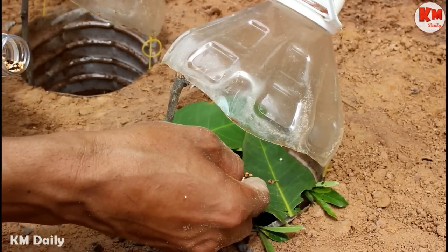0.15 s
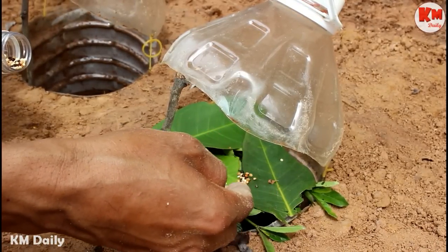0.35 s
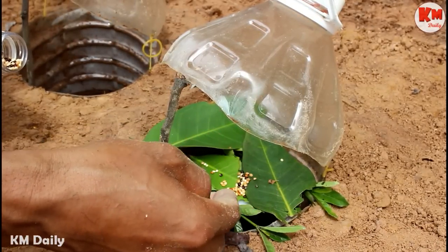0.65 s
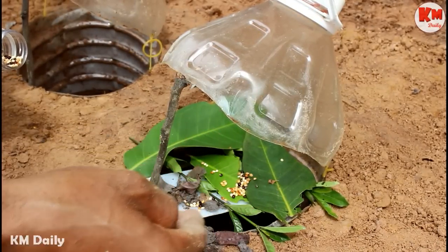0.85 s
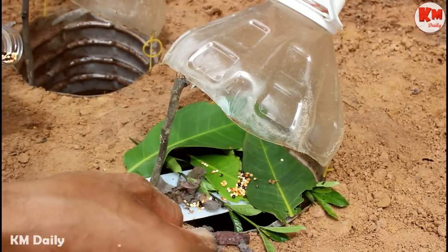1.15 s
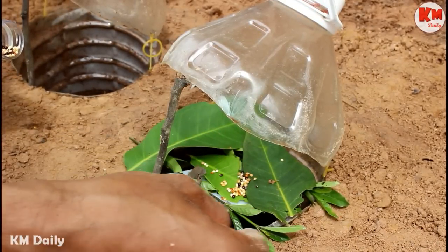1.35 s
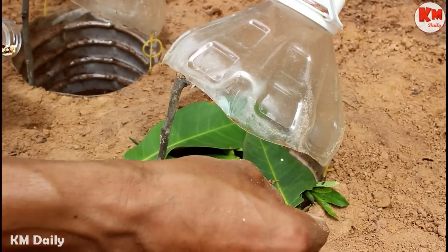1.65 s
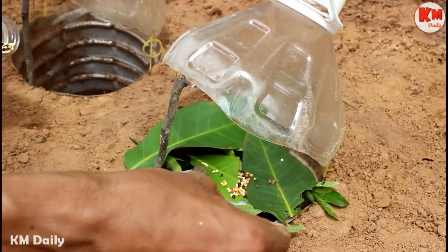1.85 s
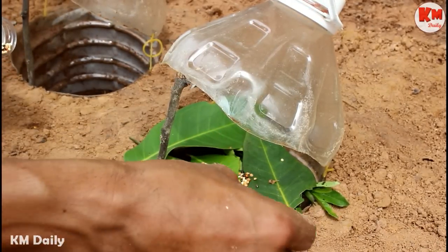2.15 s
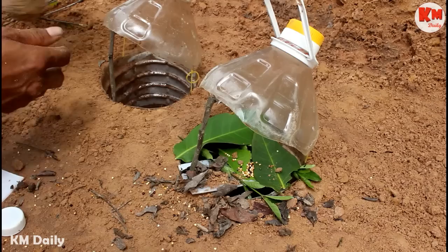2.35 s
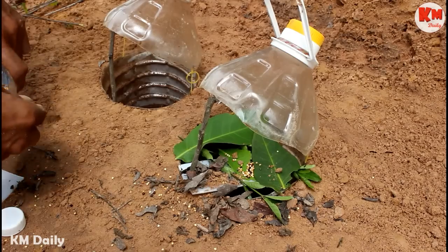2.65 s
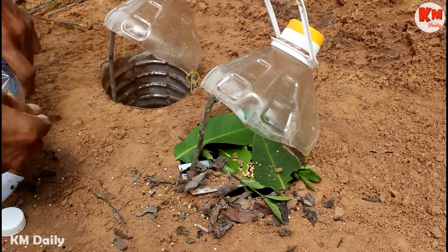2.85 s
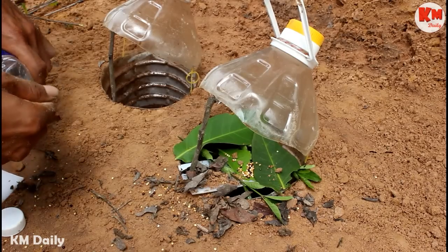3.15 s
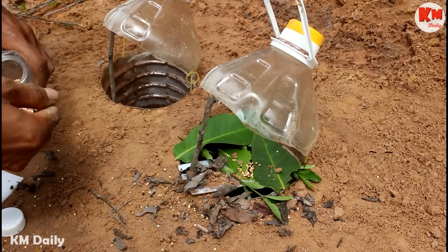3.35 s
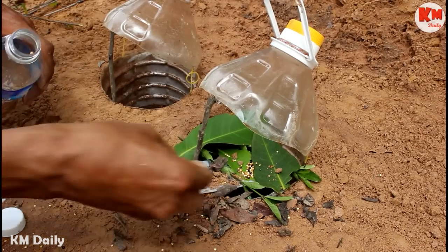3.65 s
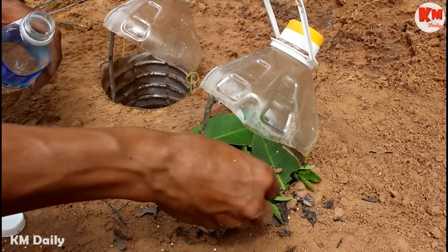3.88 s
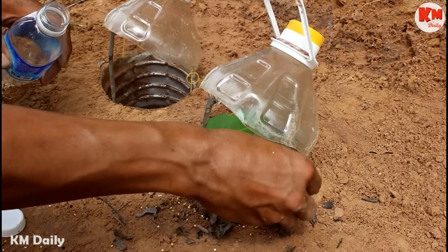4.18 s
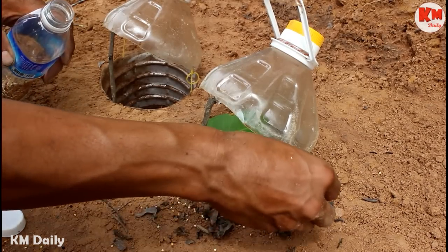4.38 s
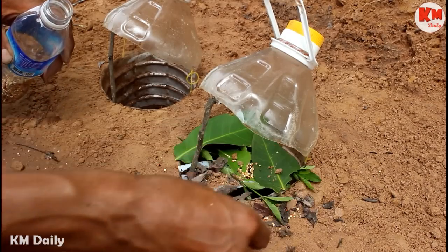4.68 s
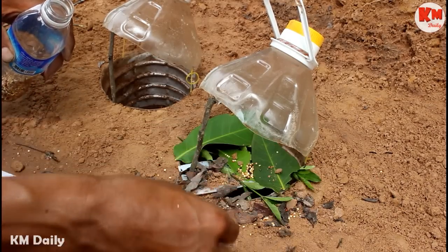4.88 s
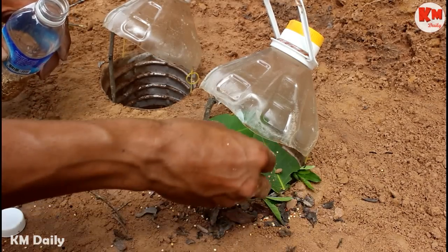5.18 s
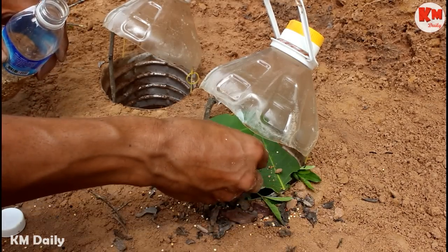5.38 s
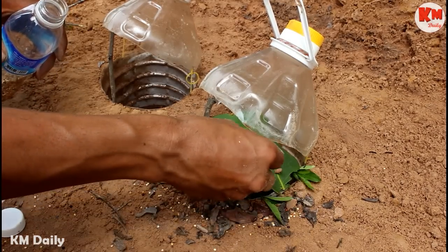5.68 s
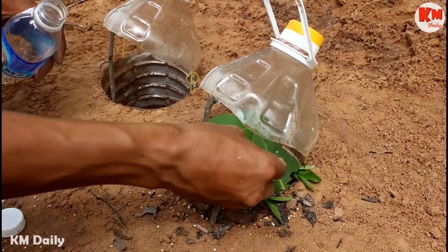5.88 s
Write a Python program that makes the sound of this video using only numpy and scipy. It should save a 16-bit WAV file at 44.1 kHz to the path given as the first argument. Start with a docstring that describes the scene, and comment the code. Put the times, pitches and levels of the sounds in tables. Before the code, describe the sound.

A close stereo microphone in open countryside catches crisp leaf crackles and fine grit under fingers, with a dull soil bump. Far knocks, chirps and a low engine-like hum sit faintly behind. After a very short complete silence, loose seed shakes and slides in a plastic bottle, which knocks against the hand. A few low gusts lead into sparser twig snaps and light scratching.

```python
"""Seed rattles out of a small plastic bottle into a palm: random collisions ring the wall, the hollow and the neck,
and filtered modes give the taps on the wall. Before it, fingers settle leaves and twigs on dry soil:
noise bursts snap, grit crackles, sand ticks and soil thuds. A short silence parts the two; more snaps and rubbing
follow, and low gusts from the arm. Far off are a wavering sine hum, dull knocks of noise with echoes,
falling sine chirps and a narrow insect buzz over coloured noise for open air."""
import sys
import numpy as np
from scipy import signal
from scipy.fft import rfft, irfft, next_fast_len
from scipy.io import wavfile
from scipy.ndimage import uniform_filter1d

SR = 44100
rng = np.random.default_rng(int(sys.argv[2]) if len(sys.argv) > 2 else 0)


def store_wav(level_fs):
    """Save 16-bit WAV to argv[1]."""
    pcm = np.round(np.clip(np.atleast_2d(level_fs), -1, 1) * 32767)
    wavfile.write(sys.argv[1], SR, pcm.T.astype(np.int16))


N = 265702
TIME = np.arange(N) / SR   # seconds
SIZE = 2 * next_fast_len(N // 2 + 8192)   # padded transform length in samples
HZ = np.maximum(np.arange(SIZE // 2 + 1) * SR / SIZE, 1)   # pitch of each bin

# In every colour table below, each row: frequency in Hz, relative level in dB.
# In every likeness table, each row: frequency in Hz, left-right correlation from -1 to 1.

# Open air before and after the silence, and its stereo likeness.
AIR_EARLY_COLOUR = [(15, -69), (25, -23), (59, -15.5), (86, -12), (116, -11), (165, -13), (276, -15.5),
                    (571, -19), (980, -23.5), (2660, -28.5), (6830, -35), (7610, -36), (15800, -48)]
AIR_LATE_COLOUR = [(18, -41), (30, -6.5), (53, -1), (134, -1), (169, -6), (209, -6.5), (309, -7), (335, -8),
                   (424, -10.5), (697, -13), (1210, -17), (1310, -15), (1450, -17), (3270, -19),
                   (15800, -36)]
AIR_LIKENESS = [(50, 0.19), (120, 0.42), (260, -0.22), (640, -0.37), (1500, -0.52), (3500, -0.13),
                (14000, 0.08)]
AIR_EARLY_DB, AIR_LATE_DB = -51, -51.5
# The silence. Its two values: start in seconds, end in seconds.
SILENCE = (2.207, 2.302)
# Fader ride of the hum. Each row: time in seconds, level in dB.
HUM_LEVEL = [(0.0, -53), (0.05, -51), (0.71, -50.5), (0.82, -56.5), (2.1, -47.5), (2.19, -54)]
# Insect calls, each swelling to its end. Each row: time at the top in seconds, level in dB.
BUZZES = [(.8, -65.5), (1.835, -64)]
BUZZ_RISE_S, BUZZ_HOLD_S, BUZZ_FALL_S = 0.72, 0.06, 0.03
# Strokes of the fingers over leaves and grit. Each row: start at full level in seconds, hold in seconds, level in dB.
RUBS = [(0.0, .01, -52.5), (0.242, 0.91, -60), (3.88, 0.67, -60.5), (5.614, 0.3, -60.5)]
RUB_RISE_S, RUB_FALL_S = 0.61, 0.47
# Colour of the rubbed grit.
GRIT_COLOUR = [(100, -30), (500, -1), (1100, 0.5), (1800, -0.5), (4500, -3.5), (9000, -11), (15500, -35)]
# Leaves and twigs snapping. Each row: start in seconds, relative level in dB, ring in Hz,
# treble in dB before a shared boost, decay t60 in seconds.
SNAPS = [(0.0507, -43, 3340, -19, .029), (0.067, -44.5, 1720, -21, 0.057), (0.1316, -28, 4270, -14, .04),
         (0.366, -39, 5460, -13, .054), (0.3824, -36, 4400, 0, .046), (0.4555, -23, 1850, -7, 0.027),
         (0.4996, -35.5, 4290, -6, .056), (0.6888, -39, 8350, 4, 0.051), (0.817, -33.5, 8200, -4, 0.046),
         (0.978, -32, 2760, -7.5, .037), (0.9938, -35.5, 2850, -10, .025), (1.102, -36.5, 4150, -11, 0.041),
         (1.1482, -40, 3680, -31, 0.063), (1.261, -36, 3740, -8, .044), (3.153, -40.5, 3440, -25, 0.031),
         (3.973, -39.5, 2900, -8, 0.035), (4.329, -31.5, 1910, -14.5, .045), (4.3663, -43, 2080, -18, .043),
         (4.516, -38, 4400, -16, 0.015), (4.5245, -33.5, 4700, -4, 0.036), (5.1301, -42, 1680, -24, 0.044),
         (5.158, -41, 1680, -10, .04), (5.3337, -38.5, 2970, -10.5, .028), (5.799, -41.5, 5760, -11, .038),
         (5.8652, -42, 1890, -28, 0.037)]
# Colour shared by the snaps.
SNAP_COLOUR = [(60, -31), (240, -5), (450, -13), (1000, -19.5), (1800, -1), (3500, -1.5), (6000, -3.5),
               (10000, -10.5), (15500, -30)]
# Far dull knocks. Each row: start in seconds, level in dB before the echo levels.
FAR_KNOCKS = [(0.179, -50), (0.65, -51.5), (2.028, -50.5), (4.138, -53)]
# Each far blow and its echoes. Each row: delay in seconds, level in dB relative to the knock table.
FAR_ECHOES = [(0, 5), (0.046, 0), (0.088, -3)]
# Colour of the far knocks.
FAR_COLOUR = [(100, -44), (300, -7.5), (430, -7), (550, 3), (720, -11.5), (900, -22), (1250, -11.5),
              (2200, -43), (12000, -62)]
# Bird chirps. Each row: start in seconds, starting pitch in Hz, fall in Hz, level in dB before flutter.
CHIRPS = [(.285, 4280, 280, -59), (.392, 4400, 200, -58), (.514, 4340, 200, -57.5), (0.635, 4360, 220, -57),
          (.764, 4250, 219, -56.5), (.897, 4140, 214, -55), (4.782, 3470, 1310, -62),
          (5.427, 3400, 2000, -63)]
# Fingers bumping the ground. Each row: start in seconds, level in dB.
BUMPS = [(0.455, -53), (4.33, -49.5), (5.13, -57.5)]
# Colour of the soil thud.
BUMP_COLOUR = [(60, -11), (170, -6), (250, 2.5), (400, -12), (700, -14), (1300, -36), (5000, -59)]
# Sand grains ticking on the leaves. Each row: start in seconds, level in dB.
SAND = [(0.5337, -53), (0.5916, -49.5), (0.6379, -52), (0.663, -49), (0.7144, -49), (0.741, -52),
        (0.7781, -54)]
# Colour of the sand ticks.
SAND_COLOUR = [(1000, -31), (5000, -9), (8500, -5), (12000, -4), (15500, -16)]
# Surges of seed sliding in the bottle. Each row: start of full flow in seconds, hold in seconds, rattle in dB,
# rise in seconds, fall in seconds, hollow wall in dB relative to the rattle (before a shared boost),
# neck ring in dB relative to the rattle.
SHAKES = [(2.314, 0.097, -37.5, 0.031, 0.084, -16.5, -10), (2.552, .095, -32, 0.12, .1, -12, -10),
          (2.685, 0.02, -25.5, 0.1, 0.089, -21.5, -15), (2.828, 0.0086, -24, 0.041, 0.046, -17.5, -14.5),
          (2.885, 0.0088, -39.5, .04, 0.14, -15, -6.5), (3.095, 0.033, -46, 0.0034, 0.03, -14.5, -12),
          (3.282, 0.055, -44.5, 0.14, .1, -15, -14), (3.416, 0.049, -34, 0.089, 0.085, -18, -4.5),
          (3.511, 0.13, -38, 0.17, .15, -15, -13), (3.628, 0.0067, -36.5, .015, 0.029, -27, -25)]
# Colours of the bright rattle, the hollow wall and the neck.
RATTLE_COLOUR = [(400, -52), (1000, -26.5), (1700, -9.5), (2600, -2.5), (3700, 2.5), (5000, 1), (7000, -2),
                 (9000, -5), (11000, -10), (13000, -17.5), (15800, -29)]
HOLLOW_COLOUR = [(100, -14), (230, -1), (350, -13.5), (520, -1.5), (760, 0), (920, -2.5), (1150, 6),
                 (1500, 4.5), (2200, -3.5), (5000, -51), (15000, -77)]
NECK_COLOUR = [(300, -66), (1400, -25), (1850, -12.5), (2080, 1.5), (2250, -4), (2500, -7.5), (3200, -21.5),
               (15000, -60)]
# Resonances of the bottle under the seed. Each row: frequency in Hz, width in Hz,
# level in dB while upright, level in dB while tipped.
BOTTLE = [(3070, 84, -3, -3), (3700, 150, -7, -20), (4040, 19, -13, -23), (4665, 34, 0, 1),
          (5470, 130, -17, -8), (6120, 110, -14, -2), (6380, 40, -13, 2), (7850, 130, -9, -22)]
TIPPED_FROM_S = 3.2   # the bottle is tipped over the palm
# Stereo likeness of the seed.
SEED_LIKENESS = [(300, 0.37), (700, 0.85), (1500, 0.89), (4000, 0.63), (7500, 0.4), (13000, -0.27)]
# Stereo tilt of the seed. Each row: frequency in Hz, left minus right in dB.
SEED_BALANCE = [(500, -1), (2000, 3), (4400, 2.5), (8000, 1.7), (14000, -0.5)]
# Taps and bumps on the bottle. Each row: start in seconds, relative level in dB, contact cut-off in Hz,
# bass in dB, rebound delay in seconds, rebound in dB relative to the level column.
TAPS = [(2.41, -33, 896, -5.5, 0.0059, -6), (2.494, -39.5, 352, 9.5, 0.013, -4),
        (2.8825, -21.5, 1960, -4, 0.0028, -24), (3.0970, -21.5, 2740, -7, 0.00164, -11.5),
        (3.229, -18.5, 1080, -2, 0.00324, -12)]
# Modes of the bottle wall. Each row: frequency in Hz, relative level in dB, decay t60 in seconds.
WALL = [(215, -10.5, 0.094), (513, -10.5, 0.038), (736, -7.5, 0.023), (1245, -4.5, 0.012),
        (1460, -7, 0.017), (2095, -0.5, 0.019)]
# Air pushed against the microphone by the arm. Each row: start at full level in seconds, level in dB.
PUFFS = [(3.545, -38), (3.66, -29.5), (3.758, -35.5), (3.884, -37), (4.008, -39)]
PUFF_RISE_S, PUFF_HOLD_S, PUFF_FALL_S = 0.045, 0.005, 0.058
# Colour of the gusts.
PUFF_COLOUR = [(15, -24), (35, 1), (60, -1.5), (110, -7), (200, -37), (500, -64)]


def from_db(db):
    """Decibels to gain."""
    return 10 ** (np.asarray(db) / 20)


def rms_one(x):
    """Scale to unit rms."""
    return x / np.sqrt(np.mean(x ** 2) + 1e-20)


def at_hz(points):
    """Read a table at every bin, in straight lines over log frequency."""
    hz, value = np.transpose(points)
    return np.interp(np.log(HZ), np.log(hz), value)


def drift(rate):
    """Smooth random wander of unit rms, with this many knots a second."""
    knots = rng.standard_normal(4096)
    return rms_one(np.interp(TIME * rate, np.arange(len(knots)), knots))


def colour(x, spectrum):
    """Causal (minimum-phase) filter of this colour; white noise keeps its power."""
    log_gain = np.log(rms_one(from_db(at_hz(spectrum))))
    # folding the cepstrum forward puts the energy as early as possible
    cepstrum = irfft(log_gain)[:SIZE // 2]
    cepstrum[1:] *= 2
    response = np.exp(rfft(cepstrum, SIZE))
    return irfft(rfft(x, SIZE) * response)[..., :N]


def spread(pair, likeness):
    """Turn two unrelated signals into left and right with the given correlation."""
    alike = np.clip(at_hz(likeness), -1, 1)
    mid_side_gain = np.sqrt([(1 + alike) / 2, (1 - alike) / 2])
    mid, side = rfft(pair, SIZE) * mid_side_gain
    return irfft([mid + side, mid - side])[:, :N]


def resonate(x, hz, width_hz):
    """A resonance with gain 1 on top."""
    r = np.exp(-np.pi * width_hz / SR)
    top = np.array([1, 0, -1]) * (1 - r * r) / 2
    bottom = [1, -2 * r * np.cos(2 * np.pi * hz / SR), r * r]
    return signal.lfilter(top, bottom, x + 1e-18)   # the tiny offset keeps silent stretches quick to compute


def dying(start, t60):
    """An envelope that jumps to 1 and dies away."""
    age = TIME - start
    return (age >= 0) * from_db(-60 * np.clip(age / t60, 0, 10))


def swell(s, hold, db, rise, fall):
    """Attack, hold from s, release; rise and fall are the times for a tenfold change of gain."""
    away = np.maximum(s - TIME, 0) / rise + np.maximum(TIME - s - hold, 0) / fall
    return from_db(db - 20 * np.clip(away, 0, 10))


def together(gains):
    """Unrelated sounds add in power."""
    return np.sqrt(sum(gain ** 2 for gain in gains))


def add(out, sound, s, db):
    """Mix a short sound in at its time."""
    start = max(round(s * SR), 0)
    out[:, start:start + sound.shape[1]] += from_db(db) * sound[:, :N - start]


def grains(per_s, size_db, t60, count=20):
    """Random collisions of uneven size, each ringing in one of several short ways; two channels of power near 1."""
    uneven_db = size_db * np.minimum(rng.exponential(1, N), 4)
    sizes = rms_one(from_db(uneven_db)) * rng.choice([-1, 1], N)
    struck = rng.random(N) < per_s / SR
    clicks = sizes * struck * np.sqrt(SR / per_s)
    dealt = rng.integers(0, count, N)   # which ring each collision gets
    ring = dying(0, t60)[:1024]
    rings = rng.standard_normal((count, 2, len(ring))) * ring / np.linalg.norm(ring)
    return sum(signal.oaconvolve((clicks * (dealt == k))[None], rings[k], axes=1)[:, :N] for k in range(count))


def air(spectrum, db):
    """Steady outdoor noise, coloured and spread in stereo."""
    noise = colour(rng.standard_normal((2, N)), spectrum)
    return from_db(db) * spread(noise, AIR_LIKENESS)


def hum(hz=113, waver_hz=2.05, uneven_db=1.3):
    """A far engine, of which only the firing tone carries, wavering in pitch and level."""
    s, db = np.transpose(HUM_LEVEL)
    phase = 2 * np.pi * np.cumsum(hz + waver_hz * drift(14.33)) / SR
    level_db = np.interp(TIME, s, db) + uneven_db * drift(5.6)
    return np.sqrt(2) * from_db(level_db) * np.sin(phase)


def insect(hz=7600, width_hz=480):
    """A narrow high buzz, noise through two equal resonances, swells and stops."""
    noise = rng.standard_normal((2, N))
    buzz = resonate(resonate(noise, hz, width_hz), hz, width_hz)
    calls = together(swell(s, BUZZ_HOLD_S, db, BUZZ_RISE_S, BUZZ_FALL_S) for s, db in BUZZES)
    return calls * rms_one(spread(buzz, [(7000, 0.4), (8000, 0.4)]))


def rubbing():
    """Fine crackles of grit and leaf under the fingers, in uneven density."""
    per_s = 450 * from_db(4.0 * drift(14))
    crackle = colour(grains(per_s, size_db=5.5, t60=0.047), GRIT_COLOUR)
    strokes = together(swell(s, hold, db, RUB_RISE_S, RUB_FALL_S) for s, hold, db in RUBS)
    return strokes * crackle


def snaps(ring_db=3, ring_width_hz=900, tail_db=-22, tail_t60=0.081, uneven_db=-2.5):
    """A dying run of tiny fractures sets the leaf or twig ringing; the ground scatters a faint tail."""
    out = np.zeros((2, N))
    age = TIME[:SR // 8]
    treble_filter = signal.butter(2, 7000, "high", fs=SR, output="sos")
    for s, db, hz, treble_db, t60 in SNAPS:
        # a new strength every 20 samples, with a steady onset
        steps = np.repeat(rng.standard_normal(len(age)), 20)[:len(age)]
        fractures = from_db(uneven_db * steps)
        fractures[:40] = from_db(uneven_db)
        tail = from_db(tail_db - 60 * age / tail_t60)
        envelope = fractures * from_db(-60 * age / t60) + tail
        burst = rng.standard_normal((2, len(age))) * envelope
        ringing = from_db(ring_db) * resonate(burst, hz, ring_width_hz)
        crisp = from_db(treble_db + 12.5) * signal.sosfilt(treble_filter, burst)
        add(out, rms_one(burst + ringing + crisp), s, db - 20.5)
    return spread(colour(out, SNAP_COLOUR), [(1000, 1.0), (12000, 0.35)])


def far_knocks(t60=0.19, tail_db=-9, tail_t60=0.33):
    """Distant blows arrive dull, with two echoes and a diffuse tail."""
    power = np.zeros(N)
    for s, db in FAR_KNOCKS:
        for delay, echo_db in FAR_ECHOES:
            power += (from_db(db + echo_db) * dying(s + delay, t60)) ** 2
        power += (from_db(db + tail_db) * dying(s, tail_t60)) ** 2
    noise = colour(rng.standard_normal((2, N)), FAR_COLOUR)
    return np.sqrt(power) * spread(noise, [(400, 0.55), (1500, 0)])


def birds(length_s=0.0834, waver_hz=40, flicker_db=2.0):
    """Thin falling whistles that swell quickly and fade; foliage makes them flutter."""
    out = np.zeros(N)
    waver = waver_hz * drift(900)
    for s, hz, fall_hz, db in CHIRPS:
        part = np.clip((TIME - s) / length_s, 0, 1)
        pitch = hz - fall_hz * part + waver
        envelope = np.sin(np.pi * np.sqrt(part)) ** 2
        out += from_db(db) * envelope * np.sin(2 * np.pi * np.cumsum(pitch) / SR)
    return out * from_db(flicker_db * drift(180))


def bumps(t60=0.19):
    """Soil gives a short dull thud, the same in both channels."""
    thuds = sum(from_db(db) * dying(s, t60) for s, db in BUMPS)
    return thuds * colour(rng.standard_normal(N), BUMP_COLOUR)


def sand_ticks(t60=0.043):
    """Single grains land with a very short, high tick."""
    out = np.zeros((2, N))
    age = TIME[:1024]
    for s, db in SAND:
        tick = rng.standard_normal((2, len(age))) * from_db(-60 * age / t60)
        add(out, tick, s, db)
    return colour(out, SAND_COLOUR)


def seed_flow():
    """Each surge drives the rattle, the hollow wall and the neck with one envelope."""
    return together(swell(s, hold, db, rise, fall) * from_db([[0], [wall_db], [neck_db]])
                    for s, hold, db, rise, fall, wall_db, neck_db in SHAKES)


def seed(slow_per_s=1200, fast_per_s=9000, clump_db=1.0):
    """Seeds collide and slide along the wall; a faster flow is louder and denser."""
    rattle, hollow, neck = seed_flow()
    per_s = slow_per_s + fast_per_s * rattle / rattle.max()
    clumps = from_db(clump_db * drift(260))   # seeds arrive in small bunches
    hits = clumps * spread(grains(per_s, size_db=0.5, t60=0.011), SEED_LIKENESS)
    ringing = hits.copy()
    for hz, width, upright_db, tipped_db in BOTTLE:   # tipping moves the seed to another part of the wall
        gain = np.where(TIME < TIPPED_FROM_S, from_db(upright_db), from_db(tipped_db))
        ringing += gain * resonate(hits, hz, width)
    neck_hits = spread(grains(per_s, size_db=1.0, t60=0.0032, count=4), SEED_LIKENESS)
    sound = rattle * colour(ringing, RATTLE_COLOUR)
    sound += from_db(2.5) * hollow * colour(hits, HOLLOW_COLOUR)
    sound += neck * colour(neck_hits, NECK_COLOUR)
    balance = from_db(at_hz(SEED_BALANCE) * [[0.5], [-0.5]])
    return irfft(rfft(sound, SIZE) * balance)[:, :N]


def taps(side_db=-15):
    """The bottle knocks against the hand and rebounds; a soft contact wakes only the low modes."""
    out = np.zeros((2, N))
    age = TIME[:SR // 5]
    for s, db, contact_hz, bass_db, rebound_s, rebound_db in TAPS:
        modes = np.array([from_db(level - 60 * age / t60) * np.sin(2 * np.pi * hz * age)
                          for hz, level, t60 in WALL])
        modes[0] *= from_db(bass_db)
        modes[1::2] *= -1   # every other mode starts in the opposite sense
        ports = 1 + from_db(side_db) * rng.standard_normal(len(WALL)) * [[1], [-1]]   # left and right mode gains
        contact = signal.butter(4, contact_hz, fs=SR, output="sos")
        knock = signal.sosfilt(contact, ports @ modes)
        add(out, knock, s, db + 1)
        add(out, knock, s + rebound_s, db + rebound_db)
    return out


def puffs():
    """Low gusts press on the two microphone ports, mostly in opposite senses."""
    noise = colour(rng.standard_normal((2, N)), PUFF_COLOUR)
    gusts = spread(noise, [(50, -0.82), (200, -0.44)])
    strength = np.sqrt(uniform_filter1d(np.mean(gusts ** 2, axis=0), size=1500))   # evens out the gusts
    envelope = together(swell(s, PUFF_HOLD_S, db, PUFF_RISE_S, PUFF_FALL_S) for s, db in PUFFS)
    return envelope * gusts / strength


def scene():
    """Close handling over the far countryside; hum and insect sound only before the silence."""
    early = air(AIR_EARLY_COLOUR, AIR_EARLY_DB) + hum() + insect()
    late = air(AIR_LATE_COLOUR, AIR_LATE_DB)
    outdoors = np.where(TIME < SILENCE[0], early, late) + far_knocks() + birds()
    ground = rubbing() + snaps() + bumps() + sand_ticks()
    return outdoors + ground + seed() + taps() + puffs()


def record(dry, cutoff_hz=15850):
    """The sound drops out during the silence, with edges of about 2 ms; a steep filter cuts the top."""
    sounding = (TIME < SILENCE[0]) | (TIME > SILENCE[1])
    gate = uniform_filter1d(1.0 * sounding, size=96)
    top_cut = signal.ellip(12, 0.1, 80, cutoff_hz, fs=SR, output="sos")
    return signal.sosfilt(top_cut, dry * gate)


dry = scene()
out = record(dry)
store_wav(out)
```